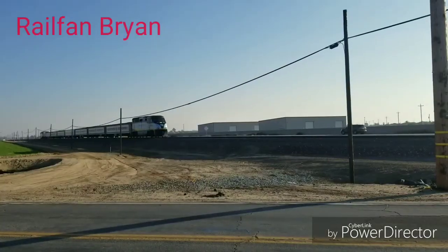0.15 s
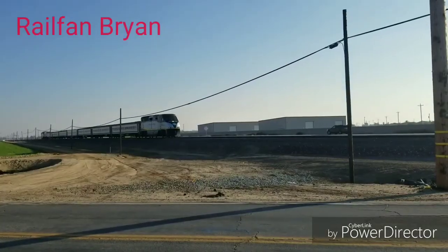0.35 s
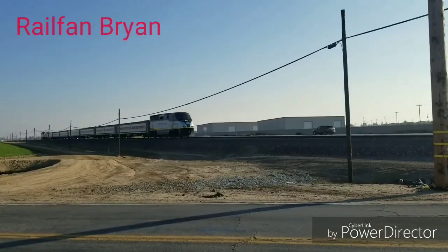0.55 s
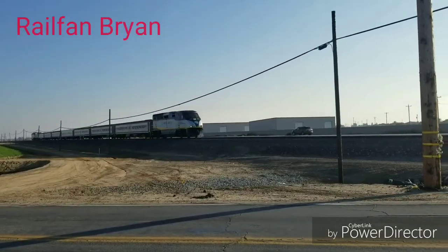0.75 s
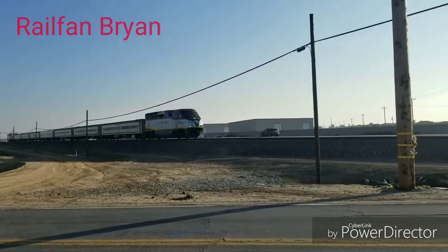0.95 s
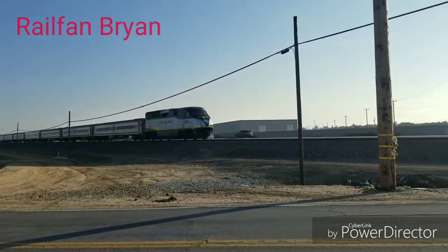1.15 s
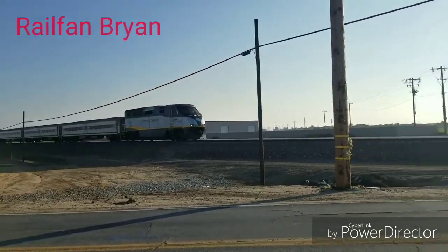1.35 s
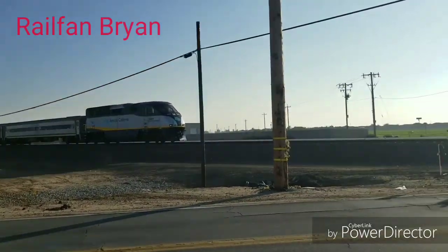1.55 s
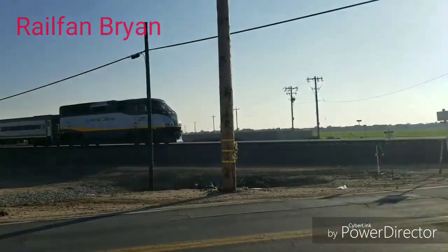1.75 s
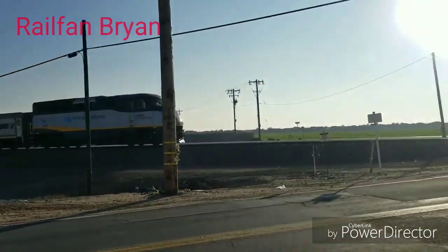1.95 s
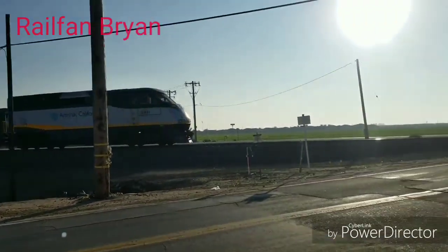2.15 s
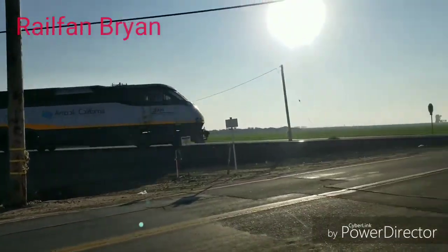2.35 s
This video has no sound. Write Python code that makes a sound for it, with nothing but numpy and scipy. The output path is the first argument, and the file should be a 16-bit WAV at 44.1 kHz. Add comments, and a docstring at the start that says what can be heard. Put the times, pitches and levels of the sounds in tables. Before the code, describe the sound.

Diesel train approaches fast at an open road crossing; its brassy chord horn hoots briefly, wheels hiss and squeal, then a second horn blast holds through the cut-off, captured by a roadside phone.

```python
"""Roadside at a crossing, phone with two unlike ports: a diesel locomotive nears at speed, pitches sinking
as the angle opens. From the start engine orders throb over uneven low rumble and filtered rolling noise, under
thin sine whines; small noise ticks sit close to the phone. At 0.8 s four bells of harmonic tones and hissing air
give a short chime blast with far echoes; rough squeals follow from the wheels. The long blast enters at 2 s, just
after the rolling peaks, and still sounds at the end, the rolling sinking behind it."""
import sys
import numpy as np
from scipy import signal
from scipy.fft import rfft, irfft
from scipy.io import wavfile
from scipy.ndimage import uniform_filter1d, map_coordinates

SR = 44100
rng = np.random.default_rng(int(sys.argv[2]) if len(sys.argv) > 2 else 0)


def output_pcm(signal):
    """Save a mono or channel-first signal as 16-bit PCM at the path in sys.argv[1].

    Samples are clipped to [-1, 1] before scaling.
    """
    pcm = np.clip(np.atleast_2d(signal).T, -1, 1) * 32767
    wavfile.write(sys.argv[1], SR, np.round(pcm).astype(np.int16))


N = 110250

# Engine as it nears: t/s, 15th order f/Hz, common level/dB
ENGINE = [(0.0, 179.4, -22.5), (0.79, 179.6, -19.5), (1.51, 178.3, -23), (1.97, 176.6, -23),
          (2.06, 177.4, -25), (2.11, 174.4, -31.5), (2.48, 170.7, -31.5)]
# Strength of each engine order: multiple of the cycle rate, relative level/dB
ENGINE_ORDERS = [(6, 2), (7, -1.5), (9, -1), (10, -26), (12, -22), (14, -16.5), (15, -6.5), (17, -26.5)]
CYCLE_START_S, ORDER_WAVER_DB = 0.01855, 1.24
# Low rumble, level in its 190-330 Hz band: t/s, level/dB
RUMBLE_LEVEL = [(0.0, -34), (0.14, -41.5), (0.21, -32.5), (0.24, -41.5), (0.69, -35), (1.27, -35.5),
                (1.93, -30.5), (2.27, -43), (2.5, -41.5)]
# Rumble colour: f/Hz, relative density/dB
RUMBLE_COLOUR = [(30, -30.5), (50, -11.5), (70, -5.5), (120, -5), (193, -7), (254, -12.5), (365, -20.5),
                 (450, -35.5), (600, -25)]
# Wheels, fans and air, level in their 2.6-7 kHz band: t/s, level/dB
ROLL_LEVEL = [(0, -41.5), (.64, -38), (1.1, -34), (1.5, -33), (1.95, -30.5), (2.2, -31.5), (2.5, -37)]
# Their colour as the left port hears it: f/Hz, relative density/dB
ROLL_COLOUR = [(210, -20.5), (350, -0.5), (469, -17.5), (574, -9), (669, -6.5), (1020, -10), (1150, -8),
               (1360, -20), (1560, -6), (2050, -20), (2300, -8), (2680, -18), (3040, -12), (3280, -16.5),
               (4610, -21), (5550, -10.5), (6470, -29.5), (7320, -33.5), (7910, -63), (9970, -31),
               (12400, -56.5), (14000, -58.5)]
ROLL_FLICKER_DB = 1
# Faint machinery whines: f/Hz, peak level/dB, middle t/s, half length/s
WHINES = [(1613, -42, .3, .5), (2687, -43, .28, .3), (4260, -47, .75, .06)]
# Small ticks near the phone: t/s, centre f/Hz, level/dB
TICKS = [(0.197, 9200, -41), (0.56, 10500, -51), (0.773, 13400, -49.5)]
TICK_RING_HZ, TICK_RING_DB, TICK_S = 4750, 1, 0.0015  # ring level is added to the tick's; time to peak
# Horn blasts: start t/s, attack time constant/s, valve shuts t/s, upper overtone tilt/dB per octave
BLASTS = [(.785, 0.011, 1.085, -5), (2.003, 0.0013, 2.6, 0.76)]
RELEASE_S = 0.009  # time constant once the valve shuts
# Lowest-numbered tones of each bell, one table per blast: t/s, pitch f/Hz, then rms level/dB of each listed tone
BELL_LOW = [
    [(.8, 753.2, -25.5, -29, -29.5), (.835, 748, -25.5, -30, -32), (.868, 738.7, -23.5, -11, -37),
     (.89, 729, -24, -17, -27), (1.035, 716.3, -22.5, -17.5, -35.5), (1.07, 729, -26, -35, -33),
     (1.1, 733, -40, -38, -45)],
    [(2.01, 739.4, -22, -20.5, -24.5), (2.046, 731.9, -35, -15, -29.5), (2.08, 711.6, -33, -15.5, -18),
     (2.11, 720.4, -28.5, -38, -16.5), (2.158, 712.2, -27.5, -25, -19), (2.2, 704.8, -28.5, -20, -29),
     (2.272, 704.7, -41.5, -11.5, -31.5), (2.33, 691.1, -29, -19.5, -31.5), (2.4, 698.6, -42, -18, -24.5),
     (2.45, 686.4, -37.5, -33, -33.5), (2.5, 696.5, -29, -27, -31)],
]
BELL_SECOND = [
    [(.8, 890, -40, -30), (.88, 894.6, -36, -32.5), (1.02, 884, -37, -37), (1.1, 871, -46, -47)],
    [(2.01, 879, -43, -27), (2.085, 881, -41, -21), (2.13, 859.6, -34, -27), (2.19, 861, -41, -26.5),
     (2.25, 880.7, -29, -36), (2.33, 859, -30, -31), (2.4, 853.5, -34.5, -35.5), (2.5, 847.3, -30, -28)],
]
BELL_THIRD = [
    [(.8, 502.3, -25.5, -50), (.86, 488, -30, -33), (.954, 488.3, -36, -32.5), (1.09, 496.6, -27, -39)],
    [(2.01, 487.3, -28, -32), (2.06, 485.8, -28, -25), (2.09, 483.8, -20.5, -45), (2.15, 482, -27.5, -34),
     (2.3, 467.5, -32.5, -46), (2.386, 469.5, -23, -29), (2.5, 459.7, -26, -50)],
]
BELL_HIGH = [
    [(.8, 567, -30, -55), (.856, 564.7, -23.5, -17.5), (.92, 557.3, -22.5, -26.5),
     (1.03, 558.2, -21.5, -32), (1.1, 553.5, -34, -54)],
    [(2.01, 552.5, -23.5, -35), (2.1, 557.8, -27.5, -26), (2.192, 546.7, -40, -40), (2.268, 542, -30, -40),
     (2.356, 540, -37, -45), (2.5, 535.6, -38, -22)],
]
# The four bells: tables, tone the pitch column gives, tones with a level column, upper overtone offset/dB
CHIME = [(BELL_LOW, 2, (1, 2, 3), 1.62), (BELL_SECOND, 2, (1, 2), -2.5), (BELL_THIRD, 1, (1, 2), -7),
         (BELL_HIGH, 1, (1, 3), -0.5)]
# Upper overtones and air, one table per blast: t/s, level/dB
UPPER_LEVEL = [
    [(.8, -22), (.86, -26.5), (.96, -18.5), (1.02, -24), (1.09, -41)],
    [(2.0, -24), (2.035, -20.5), (2.08, -26), (2.19, -19.5), (2.26, -27.5), (2.3, -20.5), (2.36, -23.5),
     (2.42, -20.5), (2.5, -24)],
]
# Colour of the bell overtones and air: f/Hz, relative level/dB
BELL_COLOUR = [(300, -28), (1000, -15), (1300, -12), (1450, -12), (1720, -3.5), (2000, -20.5),
               (2450, -11.5), (3000, -21), (3600, -16.5), (4700, -20.5), (5600, -13.5), (6300, -25),
               (8000, -48.5), (10000, -32), (12000, -50)]
BELL_JITTER, BELL_WAVER_DB, AIR_DB = 0.000547, 4.5, -8  # jitter is a fraction of pitch
SCATTER_RAD_PER_KHZ = .25  # phase wander of the upper overtones
TREBLE_SWING_PER_KHZ = 0.075  # extra share of each swell, in dB per dB
# Far echoes of the horn: mean delay/s, level/dB
ECHOES = [(.06, -13), (.11, -22)]
# Short rough wheel squeals: t/s, f/Hz, peak level/dB, half length/s
SQUEALS = [(1.32, 2420, -34, 0.027), (1.482, 2400, -27.5, 0.015), (1.8, 2400, -32, 0.023),
           (1.9, 2360, -28, 0.064)]
# Left port over right: f/Hz, level/dB
PORT_DIFFERENCE = [(60, 1.94), (370, 0.2), (600, 2.8), (1250, 1), (1550, 5.9), (2030, -5), (2400, 6),
                   (4500, 8), (5550, 18.4), (6300, 6.9), (10000, 8), (13500, -8)]
# Lead of the left port: f/Hz, phase/rad
PORT_PHASE = [(0, 0), (1120, 1.7954), (1380, 4), (1890, 3.5), (3620, 18.5), (4050, 23), (6200, 35),
              (14000, 45)]
# Likeness of wide noise at the two ports: f/Hz, shared power 0-1
PORT_LIKENESS = [(60, 0.98), (300, 1), (500, 0.78), (900, 0.65), (1350, 0.17), (2000, 0.05), (4000, 0.094),
                 (8000, 0.16)]
TOP_HZ = 14470


def undb(db):
    """Decibels to an amplitude factor."""
    return 10 ** (np.asarray(db) / 20)


def curve(table, axis=1):
    """A column of a time table, one value per sample."""
    rows = np.array(table)
    return np.interp(np.arange(N) / SR, rows[:, 0], rows[:, axis])


def over(table, hz):
    """A spectrum table read on a log-frequency axis."""
    rows = np.array(table)
    return np.interp(np.log(np.maximum(hz, 1)), np.log(np.maximum(rows[:, 0], 1)), rows[:, 1])


def walk(rate):
    """Random levels held 1 / rate s and smoothed twice; spread near 1."""
    hold = int(SR / rate)
    steps = np.repeat(rng.standard_normal(N // hold + 1), hold)
    return 1.3 * uniform_filter1d(uniform_filter1d(steps, hold), hold)[:N]


def noise(colour, flicker_db, rate, ref_hz):
    """Two unrelated noises of one colour and shared half-octave flicker; near rms 1 inside the band ref_hz."""
    hz = np.arange(N // 2 + 1) * SR / N
    inside_table = (hz > colour[0][0]) * (hz < colour[-1][0])
    spec = rfft(rng.standard_normal((2, N))) * undb(over(colour, hz)) * inside_table
    half_octave = 2 * np.log2(np.maximum(hz, 1))
    out = np.zeros((2, N))
    for k in range(9, 29):
        band = irfft(spec * np.clip(1 - abs(half_octave - k), 0, 1), N)
        out += band * undb(flicker_db * walk(rate))
    reference = irfft(spec[0] * (hz > ref_hz[0]) * (hz < ref_hz[1]), N)
    return out / reference.std()


def engine():
    """Orders of the firing cycle beat against each other once a cycle."""
    rate = curve(ENGINE) / 15
    turns = np.cumsum(rate) / SR - rate[0] * CYCLE_START_S
    throb = np.zeros(N)
    for order, db in ENGINE_ORDERS:
        throb += undb(db + ORDER_WAVER_DB * walk(4.71)) * np.cos(2 * np.pi * round(order) * turns)
    return -throb * undb(curve(ENGINE, axis=2))


def rumble():
    """Low noise of uneven level, its bands flickering apart."""
    return noise(RUMBLE_COLOUR, 2.08, 10, ref_hz=(190, 330)) * undb(curve(RUMBLE_LEVEL))


def rolling():
    """Wheels, fans and air: wide noise that swells as the train comes, then sinks."""
    return noise(ROLL_COLOUR, ROLL_FLICKER_DB, 10.96, ref_hz=(2600, 7000)) * undb(curve(ROLL_LEVEL))


def tone(hz, db, at, half, wander):
    """A sine under a bell-shaped swell, its level wavering and its phase wandering."""
    t = np.arange(N) / SR
    swell = undb(db + 2 * walk(10.6)) * np.exp(-((t - at) / half) ** 2)
    return swell * np.sin(2 * np.pi * hz * t + wander)


def whines():
    """Thin machinery tones come and go with slow phase wander."""
    return sum(tone(*row, walk(8)) for row in WHINES)


def ticks():
    """Soft short taps: a bright noise crack with a little sine ring, alike at both ports."""
    t, out = np.arange(N) / SR, np.zeros(N)
    for at, hz, db in TICKS:
        age = np.maximum(t - at, 0) / TICK_S
        crack = 2 * signal.lfilter(*signal.iirpeak(hz, 2, fs=SR), rng.standard_normal(N))
        ring = undb(TICK_RING_DB) * np.sin(2 * np.pi * TICK_RING_HZ * t)
        out += undb(db) * age * np.exp(1 - age) * (crack + ring)
    return out


def bell(tables, n, given, tones, offset_db, tilt_db):
    """Harmonics of one bell: low tones swell and fade apart as paths shift; moving air smears the upper ones."""
    upper_db = curve(UPPER_LEVEL[n])
    swing_db = upper_db - np.mean(UPPER_LEVEL[n], axis=0)[1]
    pitch = curve(tables[n]) / round(given) * (1 + BELL_JITTER * walk(30.0))
    phase = 2 * np.pi * (np.cumsum(pitch) / SR + rng.random())
    tones = [round(k) for k in tones]
    out = np.zeros(N)
    for k in range(1, int(11000 / pitch[-1])):
        khz = k * pitch[-1] / 1000
        if k in tones:
            level_db = curve(tables[n], axis=2 + tones.index(k))
            out += np.sqrt(2) * undb(level_db) * np.sin(k * phase)
            continue
        colour_db = over(BELL_COLOUR, k * pitch[::64]).repeat(64)[:N]  # read every 64 samples
        gain_db = upper_db + offset_db + colour_db + tilt_db * np.log2(khz)
        gain_db += TREBLE_SWING_PER_KHZ * khz * swing_db  # higher overtones swell and dip more
        gain_db += BELL_WAVER_DB * walk(31.89)
        out += undb(gain_db) * np.sin(k * phase + SCATTER_RAD_PER_KHZ * khz * walk(45))
    return out


def horn():
    """A valve opens and shuts on four bells and hissing air; far walls echo them with wavering delay."""
    t, direct = np.arange(N) / SR, np.zeros(N)
    air = noise(BELL_COLOUR, 2.5, 28, ref_hz=(300, 3000))[0]
    for n, (start, attack, shut, tilt_db) in enumerate(BLASTS):
        rise = 1 - np.exp(-np.maximum(t - start, 0) / attack)
        fall = np.exp(-np.maximum(t - shut, 0) / RELEASE_S)
        blast = undb(curve(UPPER_LEVEL[n]) + AIR_DB) * air
        for tables, given, tones, offset_db in CHIME:
            blast = blast + bell(tables, n, given, tones, offset_db, tilt_db)
        direct += rise * fall * blast
    out = direct.copy()
    for delay, db in ECHOES:
        path_s = delay * (1 + 0.018 * walk(12))
        out += undb(db) * map_coordinates(direct, [np.arange(N) - path_s * SR], order=1)
    return out


def squeals():
    """Short wheel tones roughened by fast phase wander."""
    return sum(tone(hz, db, at, half, 2.0 * walk(200)) for at, hz, db, half in SQUEALS)


def ports(left, other=None):
    """Left port as given; the right is later, coloured and, for wide noise, partly unrelated."""
    hz = np.arange(N // 2 + 1) * SR / N
    rows = np.array(PORT_PHASE)
    right = rfft(left) * np.exp(-1j * np.interp(hz, rows[:, 0], rows[:, 1]))
    if other is not None:
        like = np.clip(over(PORT_LIKENESS, hz), 0, 1)
        right = np.sqrt(like) * right + np.sqrt(1 - like) * rfft(other)
    return np.array([left, irfft(right * undb(-over(PORT_DIFFERENCE, hz)), N)])


def scene():
    """Train and horn reach the two ports differently; the close ticks reach both alike."""
    tonal = engine() + whines() + horn() + squeals()
    wide_left, wide_other = rumble() + rolling()
    return ports(tonal) + ports(wide_left, wide_other) + ticks()


def record(dry):
    """The phone cuts the top with a steep elliptic low-pass."""
    return signal.sosfilt(signal.ellip(8, .2, 70, TOP_HZ, fs=SR, output="sos"), dry)


dry = scene()
out = record(dry)
output_pcm(out)
```